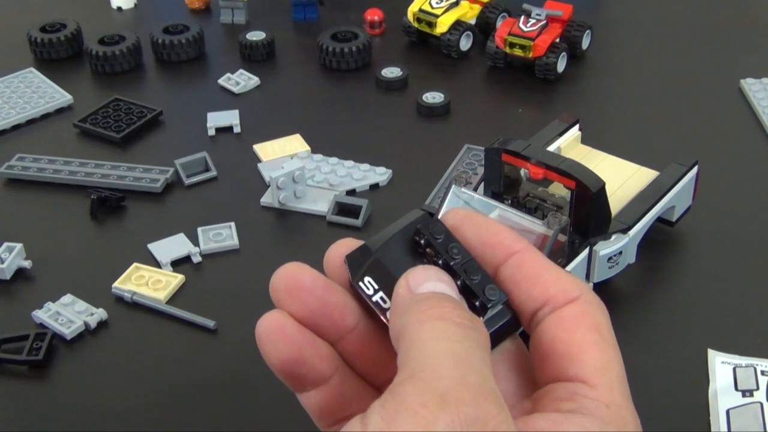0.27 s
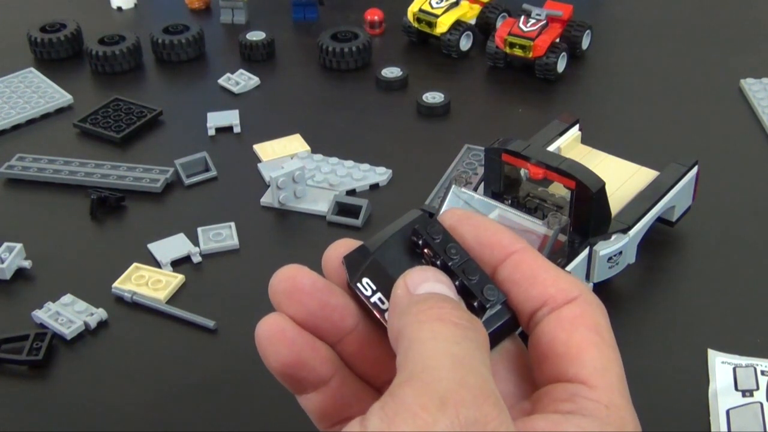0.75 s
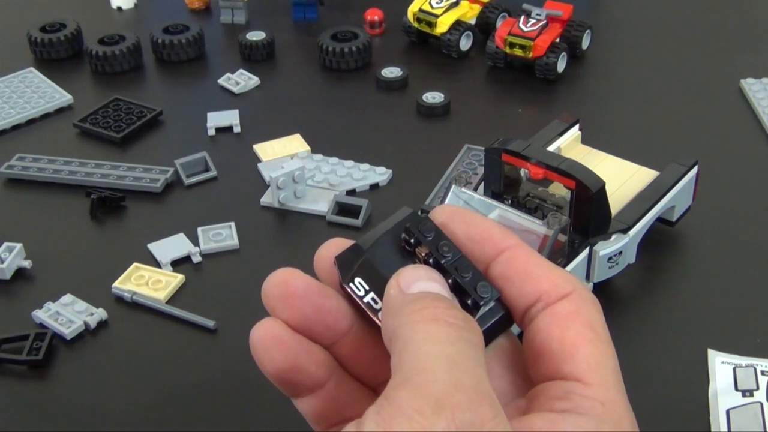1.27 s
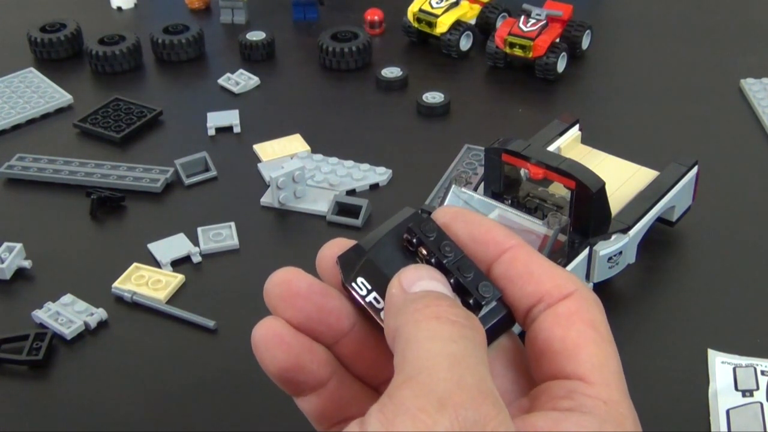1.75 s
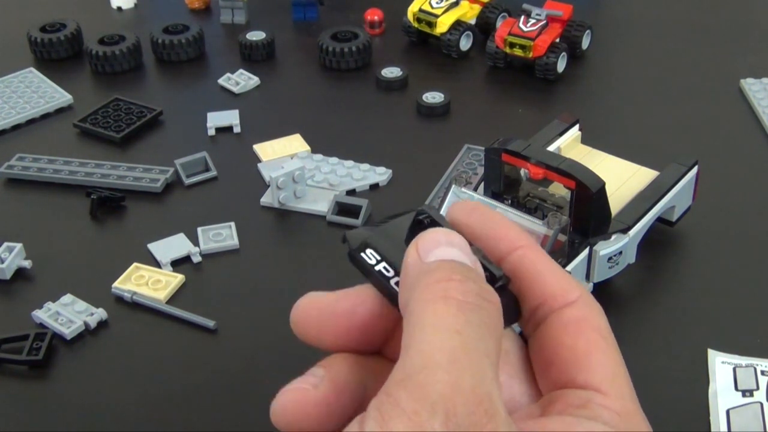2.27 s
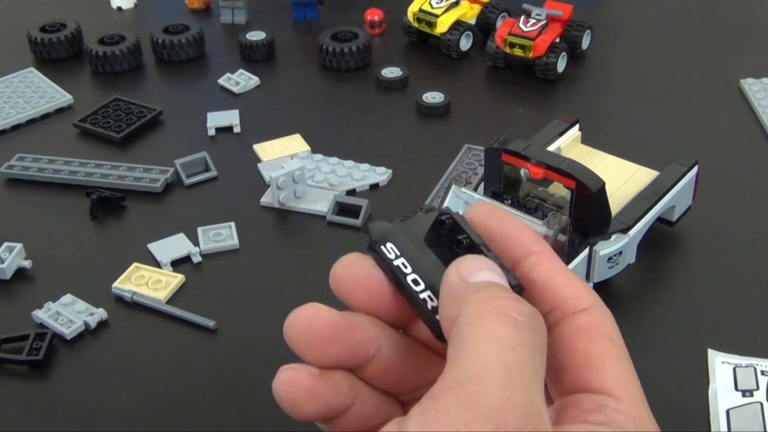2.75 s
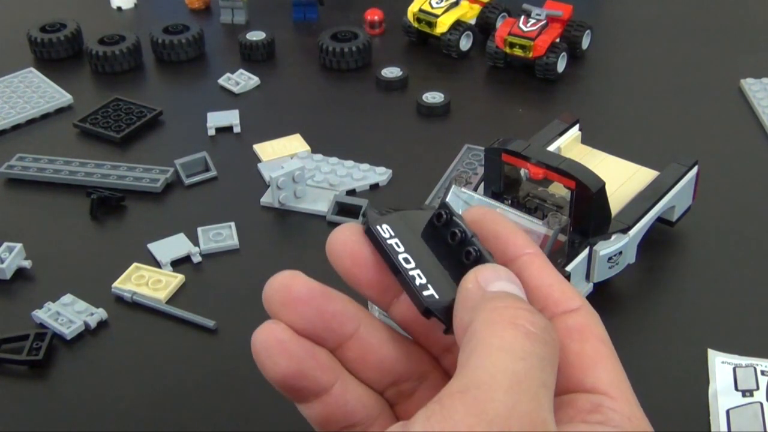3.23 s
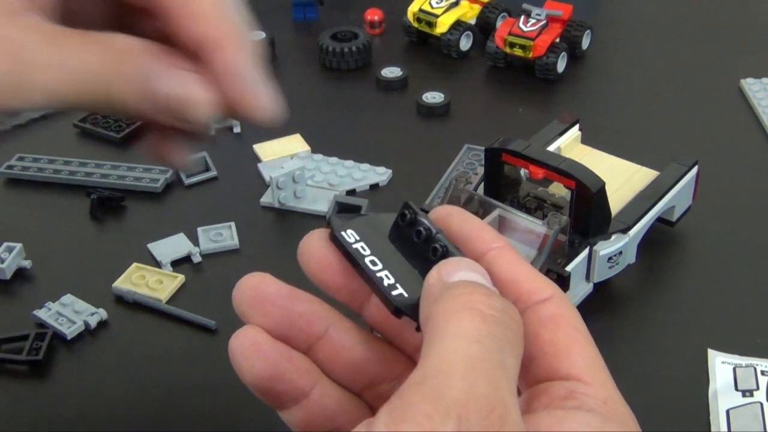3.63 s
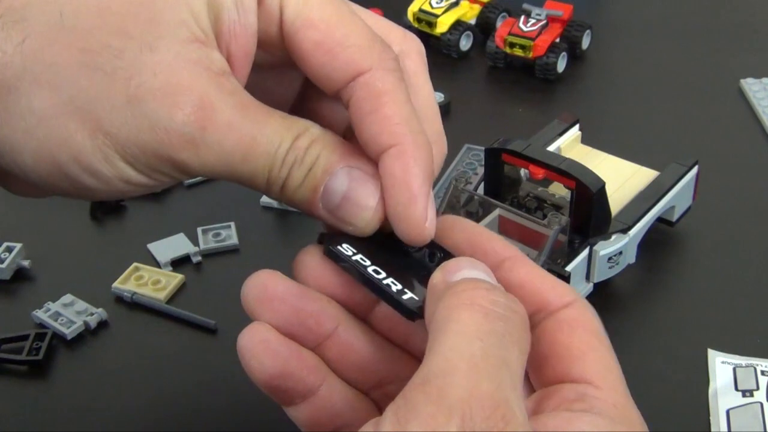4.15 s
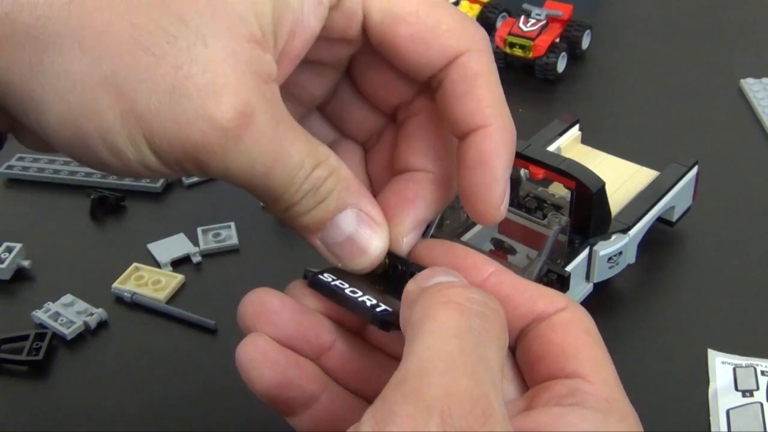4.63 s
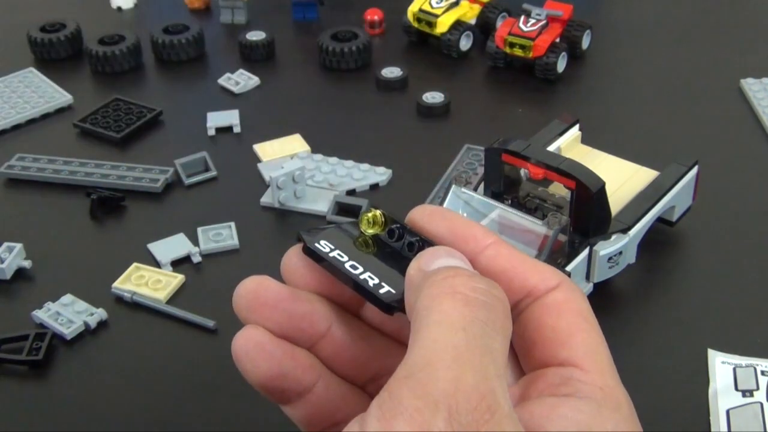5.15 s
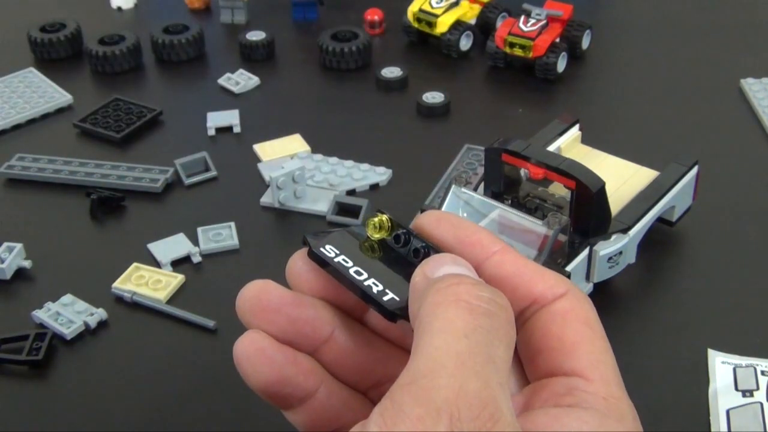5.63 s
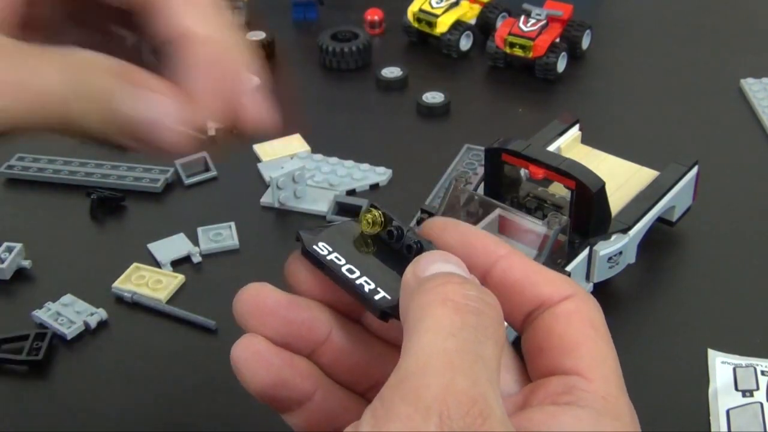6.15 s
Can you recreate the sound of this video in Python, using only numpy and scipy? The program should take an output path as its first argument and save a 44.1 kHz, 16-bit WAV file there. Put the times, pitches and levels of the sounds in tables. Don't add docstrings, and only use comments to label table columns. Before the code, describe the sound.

Close, dry handling of small plastic toy bricks over a table in a quiet room. Soft sleeve rustle and thuds come first, then a burst of sharp clicks and scrapes, a pause, and a louder, rapid rattle of plastic dragged over studs. Afterwards only dull bumps, faint cloth rubbing and a few light ticks remain over soft hum.

```python
import sys
import numpy as np
from scipy import signal
from scipy.io import wavfile
from scipy.ndimage import uniform_filter1d

SR = 44100
rng = np.random.default_rng(int(sys.argv[2]) if len(sys.argv) > 2 else 0)


def inscribe(sig):
    pcm = np.round(np.clip(np.atleast_2d(sig).T, -1, 1) * 32767)
    wavfile.write(sys.argv[1], SR, pcm.astype(np.int16))


def to_linear_factor(level_db):
    exponent = np.asarray(level_db, float) / 20
    return 10 ** exponent


N = 281975

# (pitch [Hz], width [Hz], level [dB])
BRICK_MODES = [(1150, 650, -14), (1730, 570, -9.5), (2400, 1400, 1), (2940, 1100, -3.5), (4200, 2400, 1.5),
               (5200, 2500, -6), (6400, 1400, -9), (11000, 9900, -12.5)]
# (frequency [Hz], gain [dB])
MIX_COLOUR = [(20, -7), (5500, -0.5), (6500, -6), (7700, -12.5), (8100, -23.5), (9500, -21), (9800, -17),
              (11500, -9), (12300, -42.5), (13000, -59.5)]
# (time [s], level [dB])
SLEEVE_PRESSURE = [(0, -55.5), (.12, -65), (.3, -55), (.43, -52), (.62, -62.5), (.85, -64), (1.0, -51.5),
                   (1.3, -56), (1.6, -56), (2.17, -51), (2.31, -62.5), (3.05, -51.5), (3.5, -52.5),
                   (3.6, -57), (4.8, -47.5), (5.55, -62.5), (6.0, -58), (6.39, -52)]


def read(points, hz):
    f, value = np.transpose(points)
    return np.interp(np.log(hz + 1), np.log(f + 1), value)


def evened(x):
    return x / np.sqrt(np.mean(x ** 2) + 1e-20)


def add(mix, s, sound):
    part = mix[round(s * SR):][:len(sound)]
    part += sound[:len(part)]


def colour(x, db_of_hz, size=2048):
    gain_db = np.maximum(db_of_hz(abs(np.fft.fftfreq(size, 1 / SR))), -100)
    log_gain = np.log(to_linear_factor(gain_db))
    taps = np.fft.ifft(np.exp(np.conj(signal.hilbert(log_gain)))).real[:size // 2]
    return signal.oaconvolve(x, taps)[:len(x)]


def passed(x, hz, kind="low"):
    return signal.sosfilt(signal.butter(2, hz, kind, fs=SR, output="sos"), x)


def ring(x, modes):
    t = np.arange(1500) / SR
    taps = np.zeros(len(t))
    for hz, width, db in modes:
        taps += to_linear_factor(db) * np.exp(-np.pi * width * t) * np.sin(2 * np.pi * hz * t)
    return signal.oaconvolve(x, taps)[:len(x)]


def grit(count, per_s, spread_db):
    draw, sign = rng.random(count), rng.standard_normal(count)
    size = rng.exponential(1, count)
    return (draw < per_s / SR) * sign * to_linear_factor(spread_db * np.minimum(size, 4))


def sleeve_gain():
    s, db = np.transpose(SLEEVE_PRESSURE)
    return to_linear_factor(np.interp(np.arange(N) / SR, s, db))


def swells(s, hold, db, rise, fall):
    coarse = np.arange(0, N + 64, 64)
    t = coarse[:, None] / SR - s
    gain = to_linear_factor(db - rise * np.maximum(-t, 0) - fall * np.maximum(t - hold, 0))
    return np.interp(np.arange(N), coarse, np.sqrt((gain ** 2).sum(axis=1)))


def room_tone():
    # (frequency [Hz], density [dB per Hz])
    tone = [(12, -31), (20, -2), (59, -38), (113, -0.5), (178, -21), (323, -13.5), (635, -30.5), (832, -19),
            (927, -22.5), (1090, -24.5), (3880, -50), (10500, -48.5), (12700, -56.5), (16600, -97),
            (22000, -120)]
    # (pitch [Hz], rms level [dB], width of the wavering [Hz])
    hum = [(120, -65, 20), (240, -76, 20)]
    noise = rng.standard_normal(N)
    hiss = colour(noise, lambda hz: read(tone, hz) - read(MIX_COLOUR, hz), size=16384)
    out = to_linear_factor(-55) * evened(hiss)
    t = np.arange(N) / SR
    for hz, db, width in hum:
        waver = evened(signal.lfilter([1], [1, -np.exp(-np.pi * width / SR)], rng.standard_normal(N)))
        out += to_linear_factor(db) * np.sqrt(2) * (1 + 0.57 * waver) * np.sin(2 * np.pi * hz * t)
    return out


def hand_thuds():
    # (time [s], level [dB], hold [s])
    thumps = [(0.04, -53, 0.024), (0.291, -45, 0.049), (0.575, -58, 0.028), (1.135, -50, 0.015),
              (1.45, -52, 0.016), (1.648, -39, 0.03), (1.83, -52, 0.037), (2.132, -45, 0.011),
              (2.264, -57, 0.0092), (2.837, -49, 0.009), (2.974, -48, .01), (3.064, -74, .01),
              (3.185, -41.5, 0.007), (3.296, -47.5, .01), (3.427, -47.5, 0.018), (3.651, -46, 0.01),
              (3.79, -46.5, 0.076), (3.99, -48, 0.65), (4.677, -40, 0.29), (5.067, -45, 0.1),
              (5.214, -53, 0.21), (5.647, -55, 0.017), (5.732, -49, 0.026), (5.932, -53, .01),
              (6.028, -52, 0.028), (6.2, -62.5, 0.19)]
    # (frequency [Hz], gain [dB])
    thud_colour = [(20, -10.5), (40, 2.5), (70, 1.5), (130, 2), (200, -4), (400, -15.5), (1000, -67)]
    s, db, hold = np.transpose(thumps)
    leaning = swells(s, hold, db, rise=220, fall=300)
    gain = np.hypot(to_linear_factor(-5) * sleeve_gain(), leaning)
    return gain * evened(colour(grit(N, 700, 1.4), lambda hz: read(thud_colour, hz), size=16384))


def sleeve_rub():
    # (time [s], level [dB])
    jerks = [(.05, -52.5), (.3, -52), (.98, -55), (1.07, -54), (1.18, -65), (1.64, -51), (1.85, -47),
             (2.148, -47), (2.599, -68), (2.935, -41.5), (3.082, -48.5), (3.149, -44), (3.2, -47),
             (3.809, -49.5), (4.4, -58), (4.747, -46), (5.431, -45.5), (5.612, -38.5), (5.691, -38),
             (5.747, -42.5), (6.029, -58), (6.25, -62.5)]
    # (frequency [Hz], density [dB per Hz])
    wash_colour = [(90, -43.5), (150, -4), (300, -1), (420, -1.5), (680, -8), (1100, -13), (1400, -18),
                   (2400, -25), (2800, -37.5), (4500, -55), (8000, -76.5)]
    # (pitch [Hz], width [Hz], level [dB])
    table_modes = [(444, 8.1, 20.5), (575, 57, -6), (751.7, 130, -18.5), (928, 19, 2.5), (1060, 40, 8),
                   (2000, 510, 2.5)]
    s, db = np.transpose(jerks)
    press = np.hypot(sleeve_gain(), swells(s, 0, db, rise=1500, fall=280))
    grains = grit(N, 5000, 1.5)
    wash = evened(colour(grains, lambda hz: read(wash_colour, hz), size=4096))
    return press * evened(wash + 0.16 * evened(ring(grains, table_modes)))


def finger_strokes():
    # (time [s], hold [s], scrape [dB], fine grit [dB], fade [dB per s])
    strokes = [(0.316, 0.018, -70, -88, 90), (0.969, 0.051, -62.5, -70, 199), (1.08, .005, -61, -80, 400),
               (1.168, 0.023, -67, -65, 303), (1.236, 0.083, -43.5, -66, 200),
               (1.276, 0.007, -43, -46, 153), (1.631, 0.0098, -36.5, -64, 398),
               (1.644, 0.059, -47.5, -45, 89), (1.88, 0.15, -60.5, -70, 64.5),
               (2.469, 0.33, -82.5, -92.5, 62), (2.952, 0.038, -64, -62, 122),
               (3.074, 0.062, -59, -90, 198), (3.216, 0.083, -75, -53, 199.5),
               (3.337, 0.0088, -44, -62, 304), (3.39, 0.052, -40.5, -39.5, 203.5),
               (3.525, 0.087, -69.5, -69.5, 47), (4.293, 0.17, -75, -79.5, 56),
               (4.594, 0.42, -70, -77.5, 89.5), (4.802, 0.041, -60, -68, 67), (5.435, .01, -84, -75, 65),
               (5.616, 0.087, -88, -85, 99), (5.739, 0.064, -62, -78, 143.5), (6.03, 0.021, -76.5, -88, 61),
               (6.352, .03, -80.5, -87, 70)]
    fine_colour = [(2500, -38.5), (4300, 0), (13000, -2.5)]  # (frequency [Hz], gain [dB])
    resting_db, rise, rustle_ms = -94.5, 250, 25
    s, hold, scrape_db, fine_db, fade = np.transpose(strokes)
    slide = to_linear_factor(resting_db) + swells(s, hold, scrape_db, rise, fade)
    slip = to_linear_factor(resting_db) + swells(s, hold, fine_db, rise, fade)
    scrape = evened(ring(grit(N, 6000, 1.3), BRICK_MODES[1:4]))
    fine = evened(colour(grit(N, 5800, 0.95), lambda hz: read(fine_colour, hz)))
    smooth = round(rustle_ms * SR / 1000)
    drift = uniform_filter1d(uniform_filter1d(rng.standard_normal((2, N)), smooth), smooth)
    rustle = to_linear_factor(1.2 * evened(drift))
    return slide * scrape * rustle[0] + slip * fine * rustle[1]


def skids():
    # (middle [s], peak [dB], pitch [Hz], length [ms])
    short_skids = [(2.9395, -37, 2950, 6), (2.9395, -40, 4800, 6), (5.4185, -55, 5300, 7),
                   (5.7435, -48, 5300, 5), (3.229, -26, 2720, 5), (3.2705, -31, 2340, 5),
                   (3.302, -31, 2340, 5), (4.948, -62, 4900, 6), (4.312, -62, 6600, 6),
                   (.03, -54.5, 757, 46), (4.175, -66, 3600, 50), (4.17, -71, 4100, 120),
                   (1.6245, -34.5, 5200, 11.6), (1.6245, -32, 6440, 9.2), (3.1828, -31, 5000, 9.1),
                   (3.1828, -35, 6230, 8)]
    rasps = [(1.224, -24, 2430, 14), (1.268, -34.5, 4040, 21), (1.31, -40.5, 2140, 49),
             (1.58, -35, 2347, 74), (2.966, -40, 400, 22), (4.1, -46, 337, 280), (4.27, -43, 339, 330),
             (4.42, -40.5, 332, 260), (5.442, -52.5, 2900, 37), (5.62, -54.5, 1500, 26),
             (5.702, -61.5, 3030, 87), (2.0, -62, 2300, 110), (2.13, -64, 1800, 150), (1.77, -50, 1200, 90),
             (4.86, -58, 2200, 120), (5.81, -60, 3000, 70)]
    squeaks = [(.965, -65, 5700, 37), (1.266, -32.5, 9200, 22), (1.59, -41, 9450, 114),
               (3.432, -47, 10100, 196), (1.293, -40, 9500, 5), (2.94, -48, 10000, 6),
               (5.419, -60, 9500, 8), (1.652, -33, 10500, 5), (3.393, -37, 10000, 4.9),
               (3.41, -34.5, 10500, 4), (3.417, -34.5, 10500, 4), (3.428, -43, 10550, 4),
               (3.45, -32, 10500, 7.2), (3.467, -36, 10000, 4.6), (4.17, -66, 11300, 43),
               (4.31, -54, 11400, 4.1), (4.384, -56, 11500, 4.4), (4.893, -47.5, 11250, 6.5),
               (6.35, -62.5, 11210, 11)]
    whines = [
        (2.53, -86, 4550, 200),
        (4.172, -70, 6600, 20),
        (4.175, -76, 6600, 130),
    ]
    kinds = [(short_skids, 0.07), (rasps, 0.68), (squeaks, 0.3), (whines, 0.07)]
    out = np.zeros(N)
    for rows, share in kinds:
        for s, db, hz, ms in rows:
            slips = rng.standard_normal(round(ms * SR / 1000))
            mode = [(hz, 1.5 * share * hz, 0)]
            skid = evened(ring(ring(slips, mode), mode))
            add(out, s - ms / 2000, to_linear_factor(db) * skid * np.hanning(len(slips)))
    return out


def snap(db, knock_db, knock_hz, ms, tilt_db, ring_hz, chance):
    t = np.arange(len(chance)) / SR
    blows = 0.15 * chance * np.exp(-t / (np.clip(ms, .3, 12) * .0007))
    blows[0] += 3 / max(ms, 1.5)
    late = round(1.9 * SR / 1000 + 8 * np.tanh(chance[-20]))
    reflections = [.7] + [0] * 10 + [-.5] + [0] * 15 + [.4]
    blows[late:] += to_linear_factor(-5.5) * signal.lfilter(reflections, 1, blows[:-late])

    detune = 1 + .04 * np.tanh(chance[-len(BRICK_MODES):])
    tilt_db = np.clip(tilt_db, -20, 14)
    modes = []
    for (hz, width, level), k in zip(BRICK_MODES, detune):
        near_db = 7 * np.exp(-(np.log2(hz / ring_hz) / 0.75) ** 2)
        modes.append((hz * k, width, level + near_db + tilt_db * np.log2(hz / 3000)))
    brick = passed(ring(blows, modes), min(1400, 0.78 * ring_hz), "high")
    brick = passed(brick, np.clip(9100 * 2 ** (tilt_db / 14), 4000, .45 * SR))

    push = np.gradient(uniform_filter1d(blows, size=12, origin=5))
    partials = [(.68, -2), (1, 0), (1.45, -6), (2.1, -11)]  # (pitch ratio, level [dB])
    knock = ring(push, [(knock_hz * k, .3 * knock_hz * k, g) for k, g in partials])
    return to_linear_factor(db) * (brick / abs(brick).max() + to_linear_factor(knock_db) * knock / abs(knock).max())


def bricks():
    # (time [s], tick peak [dB], knock above tick [dB], knock pitch [Hz], brightness [dB per octave])
    knocks = [(0.2927, -39.5, 0.5, 434, -28), (0.9061, -48, 4, 560, -11), (0.9476, -42, 7, 433, -26),
              (2.15, -78, 28, 349, -1), (2.817, -62, 25, 574, -1), (2.86, -60, 18, 350, -3),
              (2.9185, -40.5, 10, 930, -4), (3.1467, -42, 16.5, 1000, -6), (3.9598, -69, 4.5, 351, 2),
              (4.3104, -55.5, 5, 416, 10), (4.3798, -44, 7.5, 419, 15), (4.608, -60, 4, 600, 2),
              (4.946, -54, 21.5, 463, 8), (5.6051, -48.5, 16, 685, -22)]
    # (time [s], peak [dB], knock pitch [Hz], chatter [ms], brightness [dB per octave])
    taps = [(0.991, -44, 444, 5.1, 18), (1.219, -33, 1080, 3.5, -2), (1.3614, -31.5, 1280, 3.1, 7),
            (1.55, -25, 1150, 13, 17), (1.848, -30, 1260, 5, -1), (2.8881, -45, 1000, 4, 8),
            (2.9287, -34, 420, 3.8, -2), (3.151, -26, 587, 2, -6), (3.1815, -18.5, 635, 5.3, 14),
            (3.7943, -62, 502, 2.7, 4.5), (4.5308, -52, 570, 2.7, -16), (4.805, -38, 413, 1.2, -21),
            (5.4123, -47.5, 563, 2.1, -8.5), (5.4153, -36, 381, 14, -7.5), (5.7418, -28, 1150, 2, -3),
            (6.3488, -43.5, 825, 3.5, -23)]
    # (time [s], peak [dB], chatter [ms], brightness [dB per octave], strongest ring [Hz])
    clicks = [(1.0203, -44, 4.7, -7, 5000), (1.058, -39, 4, -4, 1800), (1.1728, -20, 2.6, -10.5, 2500),
              (1.223, -26, 1.8, -4, 2900), (1.2344, -22, 2.7, -9.5, 1510), (1.2908, -17, 4.1, 0.5, 3150),
              (1.541, -17, 8.5, 9, 2620), (1.6504, -12, 4.5, 14, 6000), (2.9377, -26, 2, 12, 5500),
              (4.8917, -29, 1.2, -2, 3000), (4.398, -56, 2, 3, 3000), (4.808, -54, 4.4, 8.5, 5000),
              (5.766, -41, 4.6, -7, 3466), (3.152, -23.5, 2.46, 14.5, 5000), (4.531, -54, 1.8, -8, 1900)]
    rattle = [(3.2271, -6.5, 2.2, 6, 4500), (3.2685, -13.5, 2.6, 1, 2400), (3.3005, -11.5, 2.9, 2, 2400),
              (3.3279, -27, 3.1, -3, 2400), (3.342, -10, 2.6, 6, 5300), (3.3451, -18, 5.5, 0.5, 2400),
              (3.3843, -22.5, 1.6, 0, 4500), (3.391, -14, 2.6, 8, 5500), (3.4085, -14.5, 1.6, 6, 5500),
              (3.415, -14, 3.3, 8.5, 5100), (3.426, -25, 3.5, 5, 4000), (3.447, -19.5, 4, 6, 5100),
              (3.4505, -20.5, 3.5, 7.5, 5100), (3.4655, -21.5, 3.3, 5, 5100), (3.4745, -24.5, 3.8, 8, 4560),
              (3.481, -36, 2.5, 5, 4500)]
    kinds = [
        [(s, db, knock, hz, 2.5, tilt, hz) for s, db, knock, hz, tilt in knocks],
        [(s, db, -7, hz, ms, tilt, hz) for s, db, hz, ms, tilt in taps],
        [(s, db, -30.5, 1000, *shape) for s, db, *shape in clicks],
        [(s, db, -13.5, 950, *shape) for s, db, *shape in rattle],
    ]
    out = np.zeros((5, N))
    for rows in kinds:
        for k, (s, *blow) in enumerate(rows):
            add(out[k % 5], s, snap(*blow, rng.standard_normal(3000)))
    return out


def scuffs():
    # (time [s], peak [dB], middle
    # pitch [Hz], decay [ms])
    drops = [(.9455, -42.5, 890, 15), (1.059, -32, 900, 4.9), (1.1717, -23, 1320, 3.3),
             (1.1885, -27.5, 1200, 5.3), (1.203, -33, 1050, 2.8), (1.2228, -19, 1150, 3),
             (1.233, -26.5, 1280, 6), (1.25, -39, 1730, 6), (1.549, -26, 1000, 7), (1.564, -41, 1000, 6.5),
             (1.5744, -20, 1060, 2.3), (1.599, -26, 1030, 7.9), (1.615, -27.5, 1150, 8.1),
             (1.65, -19.5, 1110, 4), (1.695, -38, 1200, 5.7), (2.679, -56.5, 1060, 14.5),
             (2.819, -42, 720, 3), (2.919, -33, 930, 9), (2.925, -35, 600, 4), (3.1467, -29.5, 920, 4.4),
             (3.157, -31.5, 570, 6.7), (3.187, -30, 600, 5), (4.127, -53, 907, 5), (4.398, -42.5, 900, 3.3),
             (4.688, -46, 1090, 22), (4.752, -47, 1100, 46), (4.81, -52, 2300, 47), (5.414, -39, 480, 18),
             (5.417, -43, 1800, 14), (5.6045, -28, 757, 6.4), (5.618, -28.5, 446, 11.4),
             (5.636, -41, 700, 6.8), (5.655, -36, 593, 8.7), (5.686, -34, 420, 14), (5.744, -32, 1250, 8),
             (6.0232, -36, 470, 3), (1.545, -26.5, 2600, 14), (5.071, -60.5, 2000, 58),
             (4.53, -51, 1800, 3), (1.848, -41, 1500, 7.2), (3.3, -35, 800, 57), (1.32, -43.5, 1750, 16),
             (4.558, -34, 130, 3), (4.693, -27.5, 130, 4.7), (4.892, -28, 144, 3.1), (5.624, -38, 200, 22),
             (2.951, -37.5, 170, 14), (1.627, -29.5, 140, 16), (1.651, -28.5, 120, 22),
             (1.5415, -28, 800, 4), (1.058, -35, 2000, 5), (2.9385, -31, 1060, 2.5), (2.6, -42.5, 300, 2.3),
             (5.61, -32, 530, 6), (1.291, -30, 1000, 4), (3.191, -33, 350, 3.3)]
    # (pitch [Hz], width [Hz], level [dB])
    plate_modes = [(126, 40, 1.5), (160, 45, -0.5), (245, 31, -0.5), (407, 38, 0.5), (570, 55, -3.5),
                   (636, 83, 2.5), (930, 52, 0.5), (1072, 78, 1.5), (1209, 65, -5), (1380, 140, 2),
                   (1760, 90, 3), (2300, 120, -6), (2700, 140, -2), (2960, 120, -7.5)]
    out = np.zeros((5, N))
    t = np.arange(6000) / SR * 1000
    for k, (s, db, hz, ms) in enumerate(drops):
        chance = rng.standard_normal(len(t))
        slips = chance * np.minimum(t / 2.9, 1) * np.exp(-t / max(ms, .5))
        slips[0] = -4 / max(ms, 1) * np.sqrt(SR / 1000)
        modes = []
        for (f, width, level), c in zip(plate_modes, chance[::-1]):
            tuned = f * (1 + .025 * np.tanh(c))
            away_db = 8.7 * (np.log2(tuned / hz) / .6) ** 2
            modes.append((tuned, width, level - away_db))
        shake = passed(ring(slips, modes), [.5 * hz, min(6 * hz, 9000)], "band")
        add(out[k % 5], s, to_linear_factor(db) * shake / abs(shake).max())
    return out


def room(x):
    # (frequency [Hz], time to fall 60 dB [s])
    decay = [(250, 0.27), (700, 0.47), (1800, 0.38), (4600, 0.17), (10000, 0.13)]
    t = np.arange(SR // 2) / SR
    taps = rng.standard_normal(len(t)) * np.clip(t / 0.0035 - .6, 0, 1)
    hz, t, z = signal.stft(taps, SR, nperseg=128)
    t60 = np.maximum(read(decay, hz), .03)[:, None]
    tail = signal.istft(z * to_linear_factor(-60 * t / t60), SR, nperseg=128)[1]
    return signal.oaconvolve(x, tail / np.linalg.norm(tail))[:N]


def scene():
    bed = room_tone() + hand_thuds() + sleeve_rub() + finger_strokes()
    skidding = skids()
    spots = bricks()
    spots[0] += skidding
    spots = passed(spots, 330, "high")
    spots += scuffs()
    echoes = sum(room(spot) for spot in spots)
    return (bed + spots.sum(axis=0) + to_linear_factor(-11.0) * echoes)[None]


def roll_off(x):
    return signal.sosfilt(signal.butter(12, 12890, fs=SR, output="sos"), x)


def record(dry):
    # (frequency [Hz], gain [dB])
    table_path = [(850, 0), (1150, 0.5), (1400, -3), (1750, -1), (2350, -2), (2650, -1), (3600, -2.5),
                  (4600, -0.5)]
    mix = colour(dry[0], lambda hz: read(MIX_COLOUR, hz) + read(table_path, hz))[None]
    return roll_off(mix)


dry = scene()
out = record(dry)
inscribe(out)
```